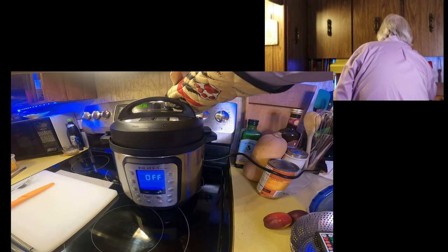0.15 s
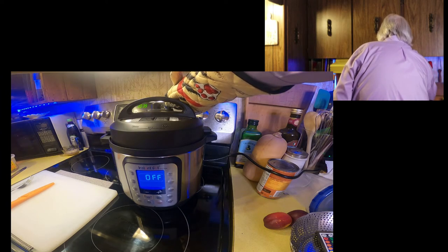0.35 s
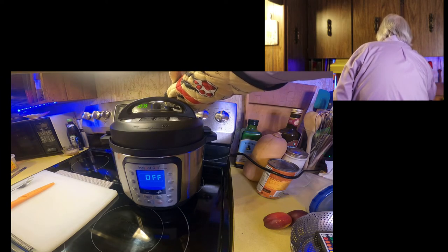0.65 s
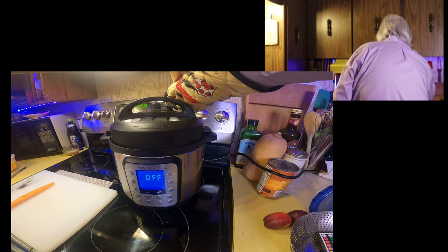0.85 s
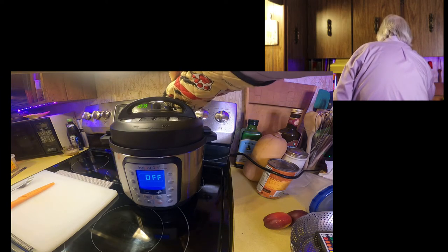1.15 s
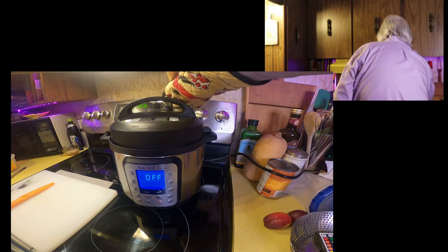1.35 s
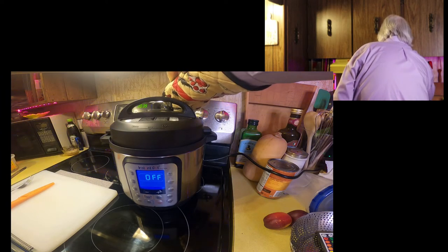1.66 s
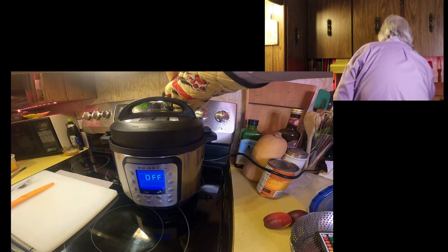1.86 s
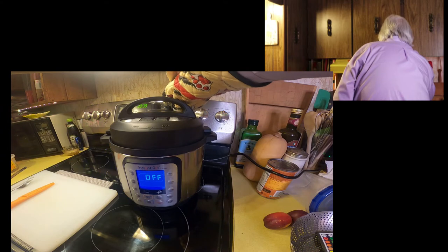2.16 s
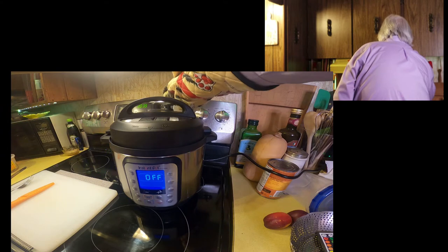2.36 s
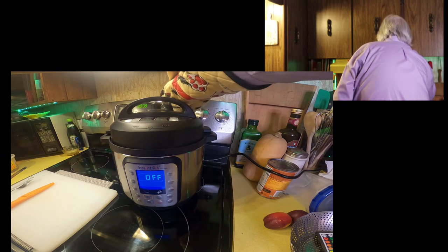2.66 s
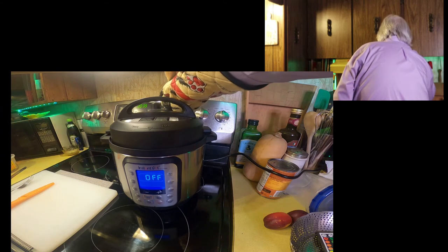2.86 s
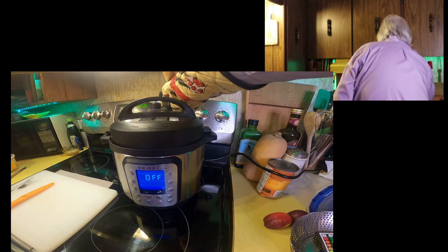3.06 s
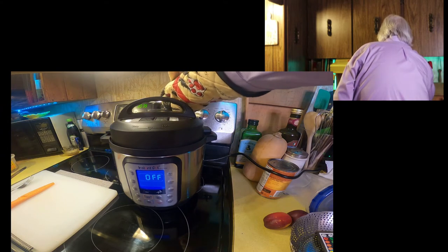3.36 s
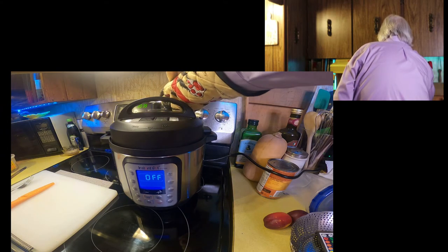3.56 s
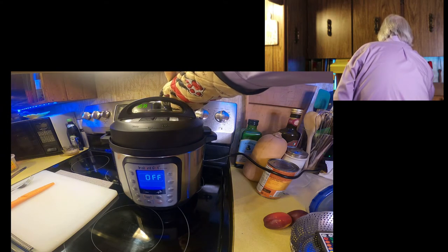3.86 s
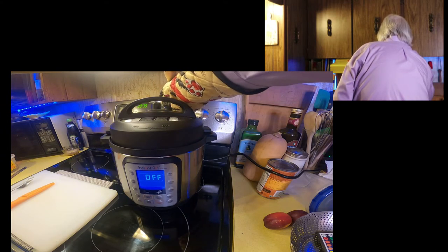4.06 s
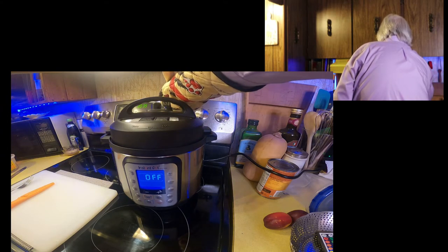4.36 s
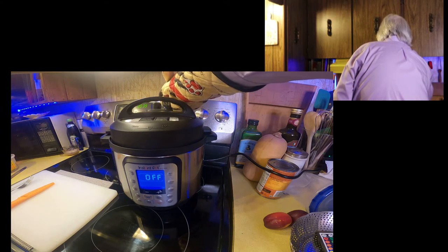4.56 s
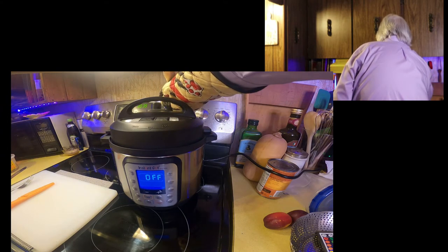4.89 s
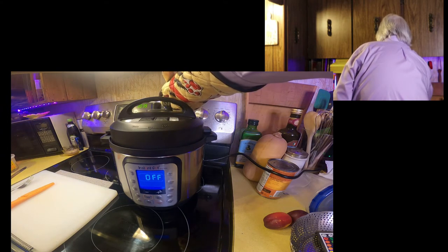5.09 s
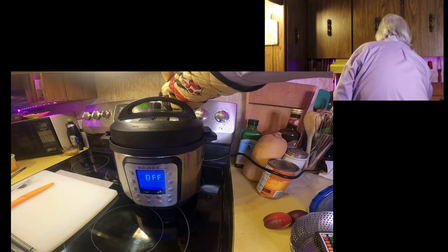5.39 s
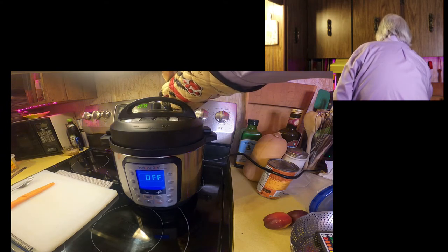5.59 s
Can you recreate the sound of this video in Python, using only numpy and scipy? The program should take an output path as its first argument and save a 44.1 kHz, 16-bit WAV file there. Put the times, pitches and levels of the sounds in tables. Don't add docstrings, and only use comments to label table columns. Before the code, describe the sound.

Steam hisses steadily from a pressure cooker valve, stops with plastic clacks and rubbing, then returns louder, fuller and slightly sputtering.

```python
import sys
import numpy as np
from scipy import signal
from scipy.fft import rfft, irfft
from scipy.io import wavfile
from scipy.ndimage import uniform_filter1d

SR = 44100
rng = np.random.default_rng(int(sys.argv[2]) if len(sys.argv) > 2 else 0)


def ratio_of_db(decibels):
    return 10 ** (np.asarray(decibels, float) / 20)


def int16_out(signal):
    q = np.round(np.clip(np.atleast_2d(signal).T, -1, 1) * 32767)
    wavfile.write(sys.argv[1], SR, q.astype(np.int16))


N = 252693

# pitch in Hz, level in dB per Hz.
HUSH = [(10, 1.5), (22, 1.5), (45, -5), (100, -9.5), (200, -13.5), (400, -12.5), (1500, -14), (2500, -22.5),
        (5000, -39), (10000, -38.5)]
HUSH_DB = -60.5
MAINS_HZ, BUZZ_START_S, BUZZ_PAIR_S = 60, .00067, .0048

# start in seconds, peak in dB, pitch in Hz.
SPITS = [(4.617, -25.5, 1060), (4.723, -43, 1090), (4.736, -30, 1170), (4.763, -24, 1130),
         (4.79, -17.5, 1140), (4.829, -29, 1050), (4.877, -22, 1110), (4.991, -28, 953), (5.022, -23, 1000),
         (5.081, -30, 1080)]

# time in seconds, level in dB.
RUB = [(2.4, -88), (2.55, -79), (2.7, -77), (2.78, -69), (2.85, -65), (2.95, -67), (3.03, -63), (3.1, -65),
       (3.2, -67)]
LEAK_S, LEAK_LENGTH_S, LEAK_DB = 2.81, .1, 9

# pitch in Hz, width in Hz, level in dB.
CAP_RINGS = [(427, 220, -16), (682, 290, 1), (1030, 160, 0), (1290, 270, -11), (1543, 150, 0.5),
             (1825, 94, 4), (2120, 260, -5.5), (3100, 940, -14.5), (4200, 1300, -14), (7650, 8400, -31.5)]
# start in seconds, peak in dB, rattle time in seconds,
# pitch of the struck spot in Hz.
KNOCKS = [(2.591, -42, .003, 1600), (2.5958, -21, .008, 1500), (2.604, -27, .005, 1000),
          (2.609, -24, .005, 1800), (2.618, -21, .007, 1250), (2.624, -28, .004, 900),
          (2.634, -39, .012, 1400), (2.658, -36, .003, 1500), (2.662, -35, .005, 1100),
          (2.68, -48, .005, 1100), (2.862, -41, .004, 1700), (2.881, -29, .003, 1000),
          (2.882, -43, .008, 3050), (2.888, -33, .01, 800), (2.905, -41, .007, 1200),
          (3.004, -52, .01, 1200), (3.018, -50, .015, 1100), (3.3452, -16, .003, 1700),
          (3.347, -26, .015, 720), (3.353, -29, .006, 1900), (3.364, -28, .014, 1750),
          (3.349, -43, .008, 330)]
# time in seconds, brightness in dB.
CLACKS = [
    (2.595, 0),
    (2.88, -9),
]
DULL_DB, DULLING_DB_PER_S = -15, 220
THUD_HZ, THUD_DB_PER_OCTAVE = 950, 6

# pitch in Hz, dB per Hz with the valve ajar, dB per Hz wide open.
NOZZLE = [(60, -32, -28), (300, -37.5, -32), (533, -25.5, -25.5), (784, -16, -14), (1050, -10.5, -7),
          (1594, -11.5, -8), (2270, -17, -11), (2985, -8.5, -3.5), (3460, 0, -0.5), (4470, -14, -10),
          (5750, -19, -14.5), (7460, -22, -13.5), (7980, -28, -19), (10060, -23.5, -17.5)]
# pitch in Hz, width in Hz, height in dB.
LID = [(624, 30, -2.9), (689, 45, 3.7), (904, 130, -1.7), (1055, 90, 3.4), (1292, 90, -5.4),
       (2046, 190, 3.0), (2283, 90, -4.5), (2562, 90, -2.4), (2735, 190, -2.0), (3036, 190, 4.3),
       (3295, 130, -5.1), (3575, 65, 4.8), (4091, 45, -4.5), (4199, 45, 4.0), (4350, 130, -6.0),
       (4651, 45, 5.0), (4888, 65, 5.4), (5017, 45, -4.1), (5146, 130, 6.7), (5383, 45, -4.5),
       (5663, 190, -2.6), (5965, 130, 3.9), (6202, 65, -4.1), (6417, 190, -2.7), (6826, 65, -3.6),
       (7192, 90, 4.5), (7903, 190, -2.8), (8570, 190, 3.7), (8915, 90, 4.2), (9410, 190, -2.6)]
# opens at seconds, shuts at seconds, flow in dB, sag in dB per second.
BLOWS = [
    (-1, 2.396, -38.6, .7),
    (3.108, 3.16, -52, 0),
    (3.156, 7, -33.1, .2),
]
OPEN_DB_PER_S, SHUT_DB_PER_S = 680, 570
SETTLE_DB, SETTLE_S = 4, .07
WIDEN_S, WIDEN_TIME_S = 3.33, .09
AJAR, WIDE = .07, .88
PUFF, PUFF_S = .55, .04
GURGLE_AJAR_DB, GURGLE_WIDE_DB = -.3, .7
PINCH_SHARE, PINCH_MAX_DB = .4, 10
# time in seconds, length in seconds, dB of the low part.
SLUGS = [
    (3.3, .1, -4),
    (4.6, .09, 8),
    (4.74, .09, 7),
    (4.87, .11, 7.5),
    (5.02, .14, 3),
    (5.4, .4, 1.5),
]

# pitch in Hz, level in dB.
EDGE = [(10150, 0.5), (10500, -9.5), (11000, -17.5), (11900, -22), (12300, -28), (12600, -62)]
# time in seconds, dB over the neighbours needed to survive.
DROPOUTS = [(.134, -1.5), (1.712, -1.2), (2.508, 1.5), (2.645, -.5), (3.158, -1.2), (3.425, 1.5),
            (3.675, 1.5), (3.785, -1.5), (3.965, -1.5), (4.011, -1.5), (4.071, 1.5), (4.18, -.7),
            (4.243, -1.5), (4.47, 2), (4.528, -1.5), (4.667, -1.2), (5.058, -2), (5.219, -1.5),
            (5.425, 1.8), (5.45, -.5), (5.619, -1.4)]
DROPOUT_S, DROPOUT_S_PER_DB = .05, .0065
# pitch in Hz, readiness in dB.
WEAKNESS = [(50, -20), (80, 6), (800, 6), (1000, 1), (4500, 0), (5500, 3), (9800, 5), (10800, 3),
            (11800, 9)]
OFFSET = -.0017


def evened(x):
    return x / np.sqrt(np.mean(x ** 2) + 1e-20)


def bump(x, middle, width):
    return np.exp(-4 * np.log(2) * ((x - middle) / width) ** 2)


def uneven(span):
    return evened(uniform_filter1d(rng.standard_normal(N), span))


def read(points, hz):
    f, value = np.transpose(points)
    return np.interp(np.log(hz + 1), np.log(f + 1), value)


def add(mix, s, sound):
    part = mix[round(s * SR):][:len(sound)]
    part += sound[:len(part)]


def filtered(x, hz, kind):
    return signal.sosfiltfilt(signal.butter(2, hz, kind, fs=SR, output="sos"), x)


def ring(x, hz, width):
    b, a = signal.iirpeak(hz, hz / max(width, 5), fs=SR)
    once = signal.lfilter(b, a, x)
    return signal.lfilter(b, a, once)


def noise(frames, *fields_db):
    a, b = rng.standard_normal((frames, 1025, 2)).T
    spectra = a + 1j * b
    return [signal.istft(spectra * ratio_of_db(db), nperseg=2048, noverlap=1536)[1][:N] for db in fields_db]


def kitchen(x, t60=0.18, wet_db=-11):
    at = np.arange(100, SR // 2, 20)
    echoes = np.zeros(SR // 2 + 20)
    echoes[at + rng.integers(0, 20, len(at))] = rng.choice([-1., 1.], len(at))
    t = np.arange(len(echoes)) / SR
    low = signal.lfilter(*signal.butter(1, 3000, fs=SR), echoes)
    high = echoes - low
    tail = low * ratio_of_db(-60 * t / t60) + high * ratio_of_db(-60 * t / (0.84 * t60))
    return x + ratio_of_db(wet_db) * signal.fftconvolve(x, tail / np.linalg.norm(tail))[:N]


def hush():
    hz = np.fft.rfftfreq(2048, 1 / SR)
    return ratio_of_db(HUSH_DB) * evened(noise(N // 512 + 5, read(HUSH, hz)[:, None])[0])


def buzz(db=-39.5):
    out = np.zeros(N + SR)
    at = np.arange(BUZZ_START_S, N / SR, 1 / MAINS_HZ)
    size = ratio_of_db(db + 1.4 * rng.standard_normal((len(at), 2)))
    out[np.round(at * SR).astype(int)] = size[:, 0]
    out[np.round((at + BUZZ_PAIR_S) * SR).astype(int)] = -size[:, 1]
    return signal.lfilter(*signal.butter(1, 900, "high", fs=SR), out[:N])


def spits():
    out, t = np.zeros(N), np.arange(2000) / SR
    for s, db, hz in SPITS:
        grit = rng.standard_normal(len(t))
        pop = ring(grit * np.exp(-t / 0.0032), hz, 260)
        tick = ring(grit * np.exp(-t / .0008), 2300, 2300)
        add(out, s, ratio_of_db(db - 3.5) * (pop / abs(pop).max() + 0.58 * tick / abs(tick).max()))
    return out


def cap(drive):
    return sum((-1) ** k * ratio_of_db(db) * ring(drive, hz, width)
               for k, (hz, width, db) in enumerate(CAP_RINGS))


def rub():
    t = np.arange(N) / SR
    s, db = np.transpose(RUB)
    grains = rng.standard_normal(N) * ratio_of_db(2.5 * uneven(200))
    leak = ratio_of_db(LEAK_DB * bump(t, LEAK_S, LEAK_LENGTH_S)) * evened(ring(rng.standard_normal(N), 1600, 90))
    drag = evened(cap(grains)) + .5 * leak
    return evened(drag) * ratio_of_db(np.interp(t, s, db, -120, -120))


def knocks():
    out, t = np.zeros(N), np.arange(4000) / SR
    for s, db, rattle, hz in KNOCKS:
        fresh_db = [top_db - DULLING_DB_PER_S * (s - at) for at, top_db in CLACKS if s >= at]
        bright_db = max([DULL_DB] + fresh_db)
        thud_db = -THUD_DB_PER_OCTAVE * max(np.log2(hz / THUD_HZ), 0)
        onset = np.minimum(t / 0.0003, 1)
        drive = rng.standard_normal(len(t)) * np.exp(-t / max(rattle, .001)) * onset
        blow = cap(drive)
        treble = filtered(blow, 2500, "high")
        bass = filtered(blow, 1100, "low")
        blow = blow + (ratio_of_db(bright_db) - 1) * treble + (ratio_of_db(thud_db) - 1) * bass
        blow = blow + 1.7 * ring(drive, hz, 450)
        add(out, s, ratio_of_db(db) * blow / abs(blow).max())
    return out


def valve(t):
    flow_db, pinch_db = np.full(len(t), -120.), np.full(len(t), 120.)
    for opens, shuts, full_db, sag_db in BLOWS:
        short_db = np.maximum(OPEN_DB_PER_S * (opens - t), SHUT_DB_PER_S * (t - shuts)).clip(0)
        since = (t - max(opens, 0)).clip(0)
        creep_db = SETTLE_DB * np.exp(-(t - opens).clip(0) / SETTLE_S)
        flow_db = np.maximum(flow_db, full_db - sag_db * since - creep_db - short_db)
        pinch_db = np.minimum(pinch_db, short_db)
    wide = ((t - WIDEN_S) / WIDEN_TIME_S).clip(0, 1)
    puff = PUFF * np.exp(-abs(t - BLOWS[-1][0]) / PUFF_S)
    opening = AJAR + (WIDE - AJAR) * wide + puff
    slugs_db = sum(db * bump(t, s, length) for s, length, db in SLUGS)
    gurgle_db = GURGLE_AJAR_DB + (GURGLE_WIDE_DB - GURGLE_AJAR_DB) * wide + slugs_db
    gurgle_db = gurgle_db + np.minimum(PINCH_SHARE * pinch_db, PINCH_MAX_DB)
    return flow_db, opening, gurgle_db


def steam():
    frames, hz = N // 512 + 5, np.fft.rfftfreq(2048, 1 / SR)
    lid_db = sum(db * bump(hz, f, width) for f, width, db in LID)
    patches = uniform_filter1d(rng.standard_normal((frames, 1025)), 4, 0)
    patches = evened(uniform_filter1d(patches, 24, 1)).T
    colours_db = [lid_db + read(np.array(NOZZLE)[:, [0, k]], hz) for k in (1, 2)]
    core = (hz > 2600) & (hz < 5000)
    total = np.sum(ratio_of_db(2 * colours_db[0]))
    colours_db = [c - 10 * np.log10(np.sum(ratio_of_db(2 * c[core])) / total) for c in colours_db]
    ajar, wide = noise(frames, *(c[:, None] + 0.49 * patches for c in colours_db))
    core_filter = signal.butter(4, [2600, 5000], "band", fs=SR, output="sos")
    scale = np.std(signal.sosfilt(core_filter, ajar))

    flutter = ratio_of_db(.5 * uneven(300))
    lumps = uneven(500)
    flow_db, opening, gurgle_db = valve(np.arange(N) / SR)
    share = np.clip(opening, 0, 1)
    jet = ((1 - share) * ajar + share * wide) * flutter / scale
    low = filtered(jet, [400, 1400], "band")
    gurgle = ratio_of_db(gurgle_db * (1 + .25 * lumps))
    return (jet + (gurgle - 1) * low) * ratio_of_db(flow_db)


def scene():
    jet = kitchen(steam(), .13, -13)
    handling = kitchen(knocks() + rub() + spits())
    return (jet + handling + hush() + buzz())[None]


def input_edge(x):
    log_gain = np.log(ratio_of_db(read(EDGE, abs(np.fft.fftfreq(2048, 1 / SR)))))
    response = np.fft.ifft(np.exp(np.conj(signal.hilbert(log_gain)))).real[:1024]
    return signal.oaconvolve(x, response)[:N]


def dropouts(x):
    out = x.copy()
    for s, margin_db in DROPOUTS:
        length = DROPOUT_S + DROPOUT_S_PER_DB * margin_db
        size = int(length * SR)
        fade = np.sqrt(signal.windows.tukey(size, min(.042 / length, 1)))
        start, hz = int(s * SR) - size // 2, np.fft.rfftfreq(size, 1 / SR)
        z = rfft(x[start:start + size] * fade)
        line = uniform_filter1d(abs(z) ** 2, size=2)
        near = int(1500 * length)
        around = uniform_filter1d(line, near)
        lost = 10 * np.log10(around / line) > -margin_db - read(WEAKNESS, hz) + 2.2
        band = uniform_filter1d(line, int(400 * length))
        lost &= band < .12 * band[hz > 400].max()
        kept = uniform_filter1d(line * ~lost, near)
        lift = np.sqrt(np.clip(around / (kept + 1e-20), 1, 2))
        out[start:start + size] += irfft(z * (~lost * lift - 1), size) * fade
    return out


def top_cut(x):
    return signal.sosfilt(signal.butter(12, 12270, fs=SR, output="sos"), x)


def record(dry):
    mix = dropouts(input_edge(dry[0])) + OFFSET
    return top_cut(mix[None])


dry = scene()
out = record(dry)
int16_out(out)
```